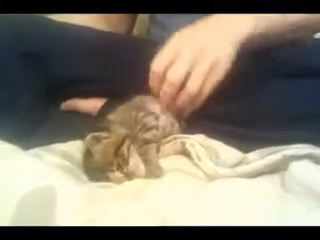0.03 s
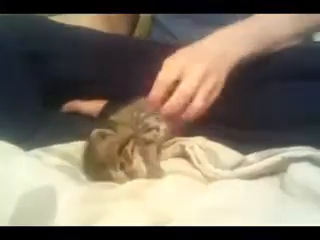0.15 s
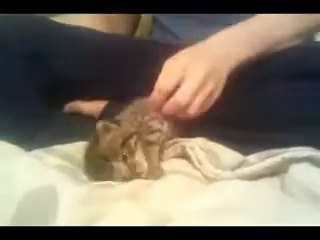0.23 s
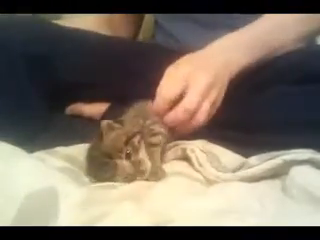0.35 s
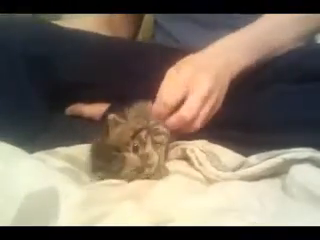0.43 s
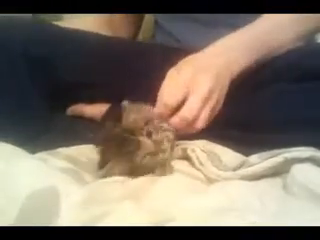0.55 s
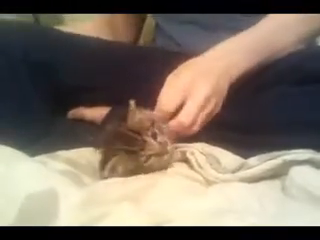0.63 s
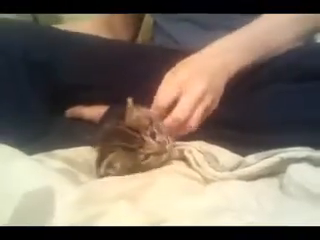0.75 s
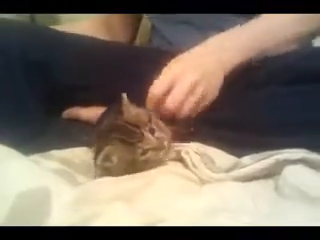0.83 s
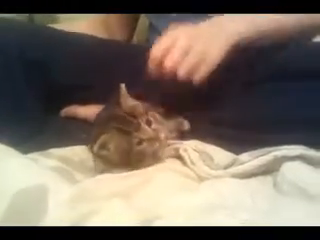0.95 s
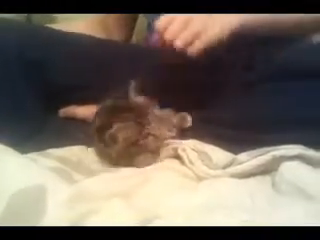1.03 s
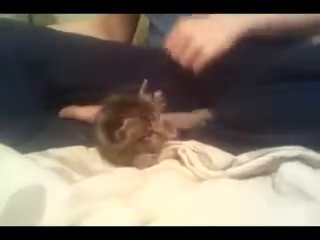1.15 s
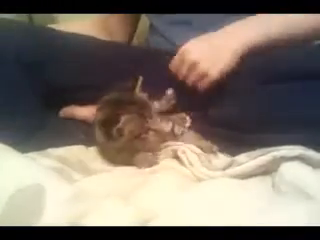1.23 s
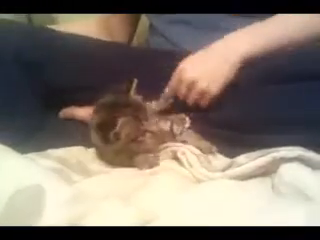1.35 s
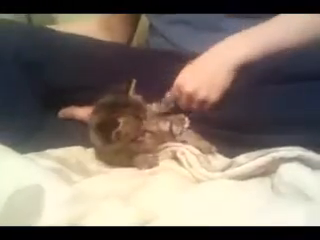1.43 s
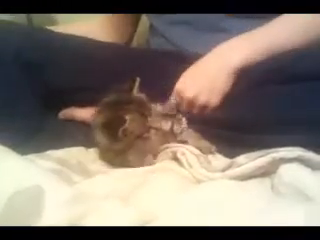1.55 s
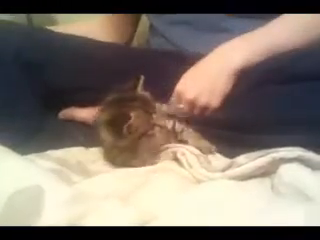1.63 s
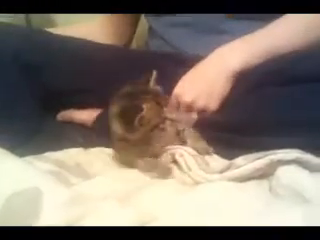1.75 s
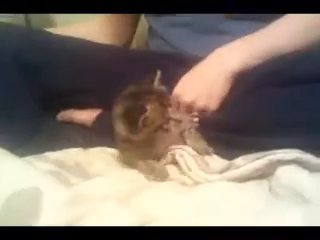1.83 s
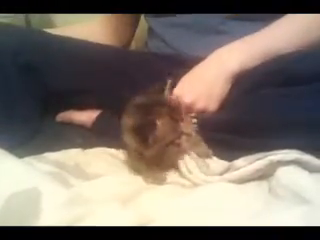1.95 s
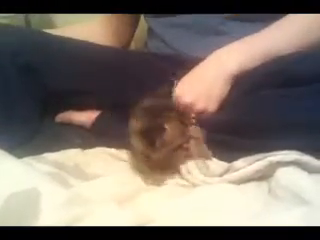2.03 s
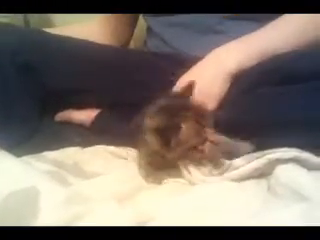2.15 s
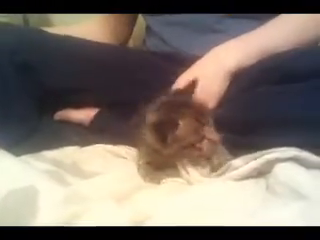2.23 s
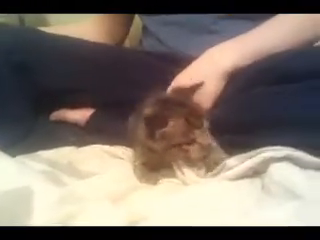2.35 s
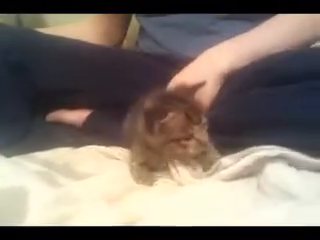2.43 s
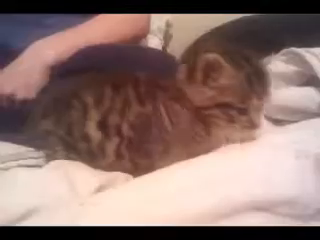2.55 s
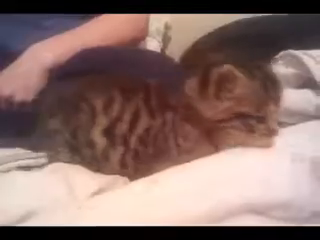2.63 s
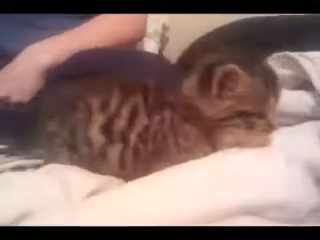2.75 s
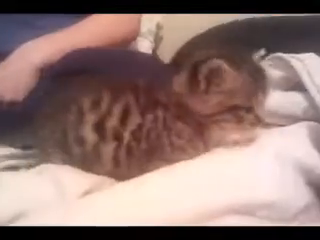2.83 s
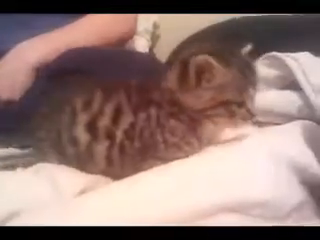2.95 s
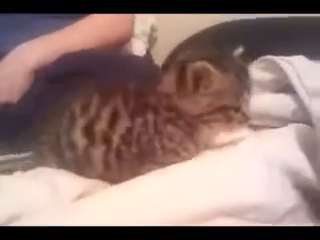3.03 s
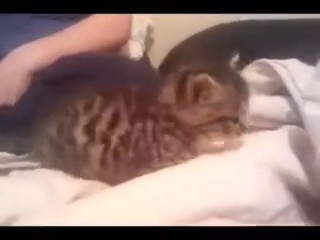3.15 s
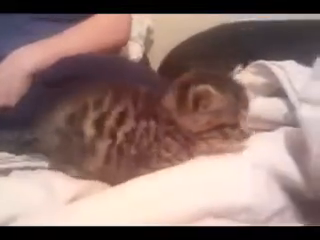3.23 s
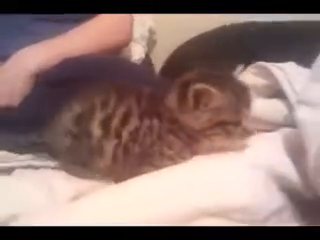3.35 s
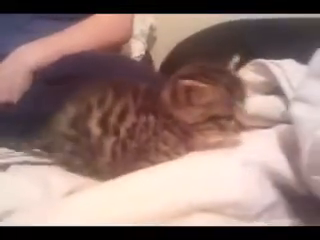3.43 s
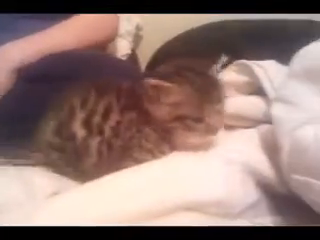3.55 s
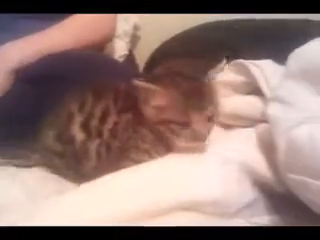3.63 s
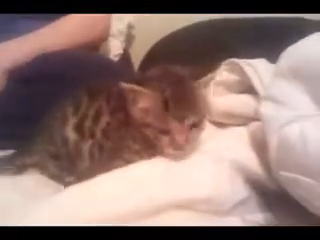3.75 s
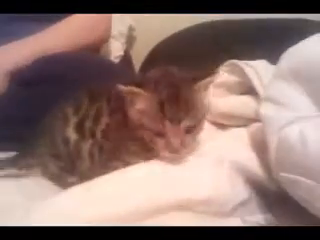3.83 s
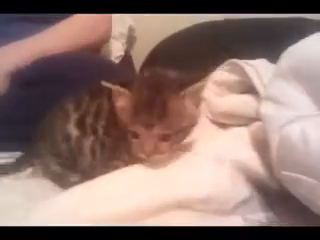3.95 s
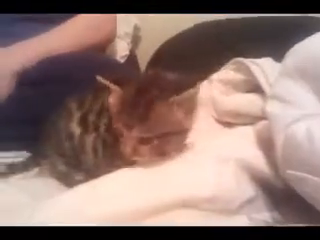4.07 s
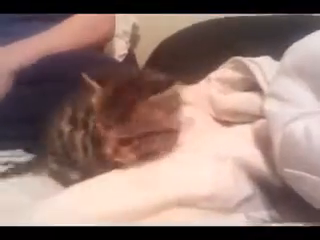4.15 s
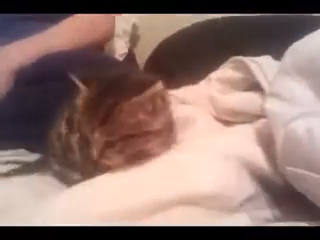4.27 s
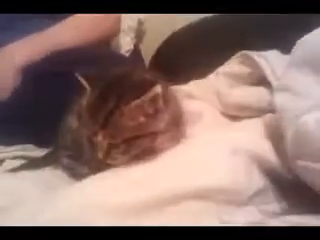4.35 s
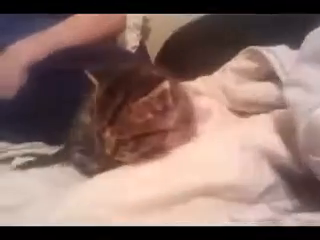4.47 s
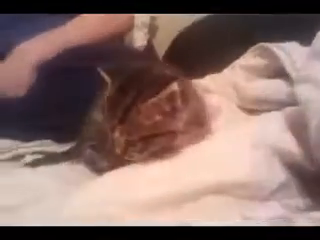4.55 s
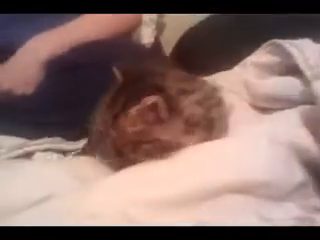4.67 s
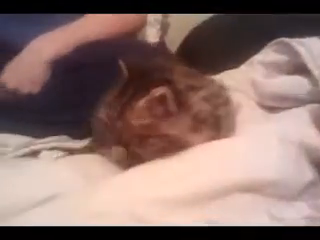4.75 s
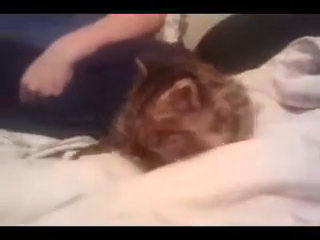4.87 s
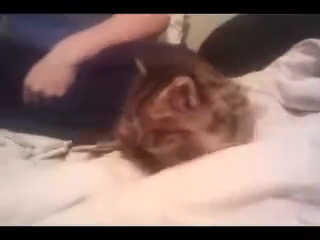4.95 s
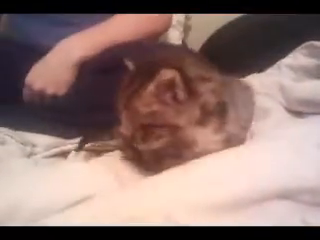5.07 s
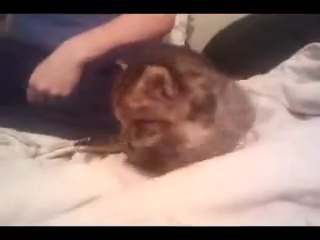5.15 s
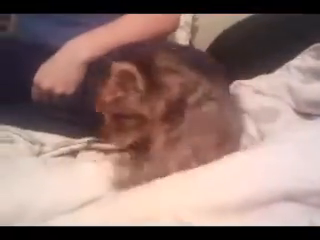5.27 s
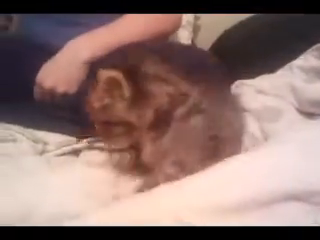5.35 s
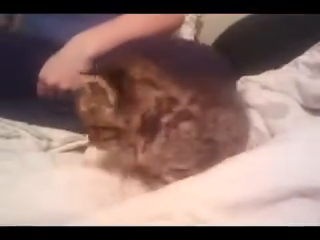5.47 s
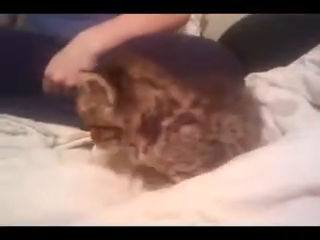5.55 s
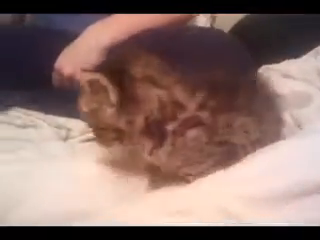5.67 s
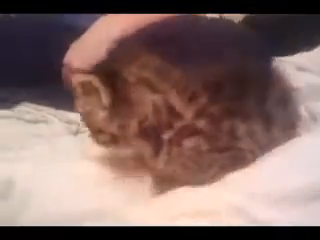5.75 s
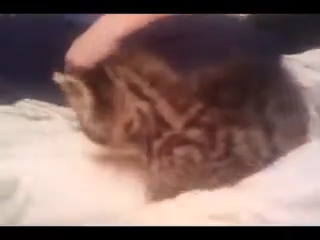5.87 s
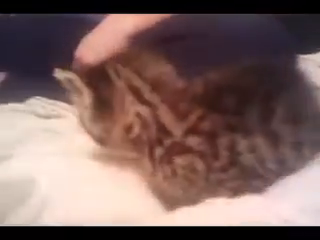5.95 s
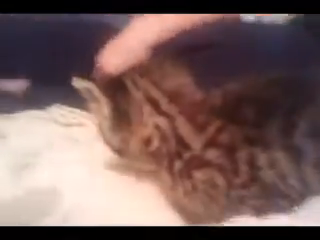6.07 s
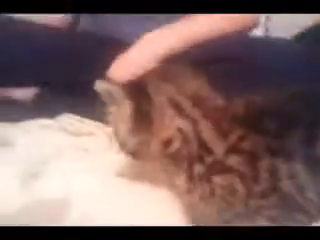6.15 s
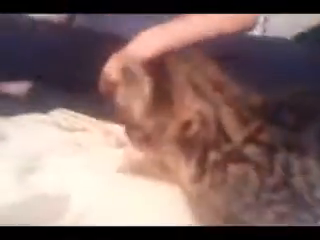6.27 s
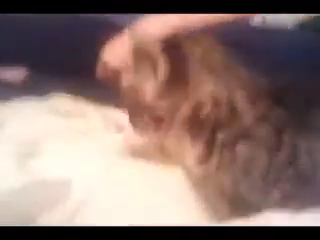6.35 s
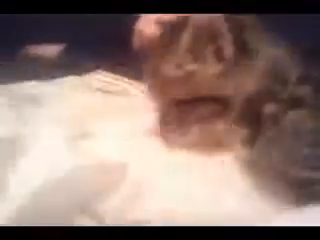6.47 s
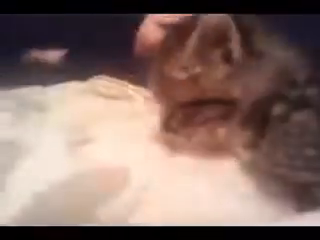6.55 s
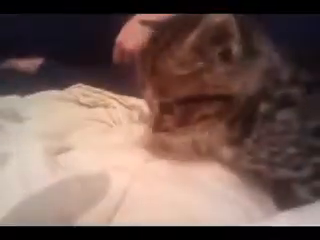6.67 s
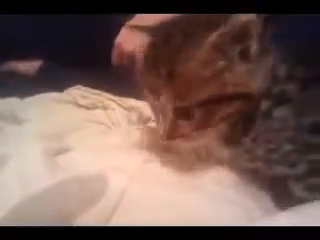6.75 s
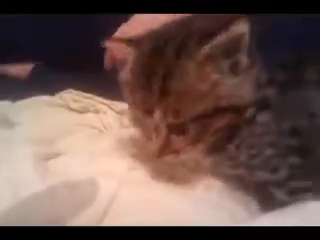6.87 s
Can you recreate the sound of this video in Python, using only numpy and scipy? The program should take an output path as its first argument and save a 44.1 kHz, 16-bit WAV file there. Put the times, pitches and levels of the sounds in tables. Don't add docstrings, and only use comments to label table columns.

```python
import sys
import numpy as np
from scipy import signal
from scipy.fft import rfft, irfft, next_fast_len
from scipy.io import wavfile
from scipy.ndimage import uniform_filter1d, map_coordinates

SR = 44100
rng = np.random.default_rng(int(sys.argv[2]) if len(sys.argv) > 2 else 0)


def inscribe(sig):
    pcm = np.round(np.clip(np.atleast_2d(sig).T, -1, 1) * 32767)
    wavfile.write(sys.argv[1], SR, pcm.astype(np.int16))


def nominal_scale(level):
    x = np.asarray(level, float) / 20
    return 10 ** x


N = 304579
SHORT_T = np.arange(SR // 4) / SR


def unit(x):
    return x / np.sqrt(np.mean(x ** 2) + 1e-20)


def along(points, hz):
    f, v = np.transpose(points)
    return np.interp(np.log(hz + 1), np.log(f + 1), v)


def curves(rows):
    s, *cols = np.transpose(rows)
    t = np.arange(N) / SR
    gate = np.clip(np.minimum(t - s[0], s[-1] - t) / .006, 0, 1)
    return [gate] + [np.interp(t, s, c) for c in cols]


def wobble(rate):
    knots = rng.standard_normal(int(N * rate / SR) + 4)
    return map_coordinates(knots, [np.arange(N) * rate / SR])


def filtered(x, response):
    m = next_fast_len(N + 8192)
    return irfft(rfft(x, m) * response(np.fft.rfftfreq(m, 1 / SR)), m)[..., :N]


def noise(spectrum):
    closed = [(spectrum[0][0] / 2, -90)] + list(spectrum)
    return unit(filtered(rng.standard_normal(N), lambda hz: nominal_scale(along(closed, hz))))


def add(track, s, sound):
    part = track[round(s * SR):][:len(sound)]
    part += sound[:len(part)]


def hump(start, length, db, swell_db, edge):
    t = np.arange(N) / SR - start
    ends = np.clip(np.minimum(t, length - t) / edge, 0, 1)
    return ends * nominal_scale(db + swell_db * np.clip(t / length - .5, -.5, .5))


def ring(s, db, hz, t60):
    drift = np.cumsum(rng.normal(0, .1, len(SHORT_T)))
    level = nominal_scale(db + 3.0 - 60 * SHORT_T / t60) * (1 - np.exp(-SHORT_T / 0.00014))
    return level * np.sin(2 * np.pi * hz * SHORT_T + drift)


def thud(db, hz, t60):
    return -nominal_scale(db + 2.5 - 60 * SHORT_T / t60) * np.sin(2 * np.pi * hz * SHORT_T)


def glide(length, start_hz, end_hz, db, octave_db):
    u = np.linspace(0, 1, round(length * SR))
    phase = 2 * np.pi * np.cumsum(start_hz + (end_hz - start_hz) * u) / SR
    phase = phase + np.cumsum(rng.normal(0, .035, len(u)))
    swell = np.abs(np.sin(np.pi * u ** .7)) ** .6
    octave = nominal_scale(octave_db) * swell ** 4 * (1 - u) * np.sin(2 * phase)
    return nominal_scale(db + 2) * swell * (np.sin(phase) + octave)


def rub(rows, edge):
    flutter = nominal_scale(0.4 * wobble(51) + 0.34 * wobble(500))
    swish, body = unit(flutter * noise(SWISH)), unit(flutter * noise(BODY))
    return sum(hump(*row, edge) * (swish + nominal_scale(body_db) * body) for *row, body_db in rows)


# start_s, level_db
AIR_DRIFT = [(0, 0.5), (.6, -.5), (.95, 0.3), (1.4, 0), (2.7, -0.26), (3.4, 1), (4.25, -0.9), (5.5, 0),
             (6.91, 0.5)]
# pitch_hz, level_db (per Hz)
RUMBLE_COLOUR = [(8, -15.5), (20, -2), (45, 3.5), (80, -4.5), (130, -39.5)]
ROOM_COLOUR = [(60, -7.5), (100, 2.5), (135, 0), (165, -4.5), (200, -2.5), (225, -3.5), (255, -1.5),
               (330, -6.5), (400, -6), (550, -13.5), (900, -25)]
HUM_COLOUR = [(185, -30), (197, 0), (203, 0), (216, -30), (400, -90)]
HISS_COLOUR = [(300, -7), (600, 7.5), (1250, 1.5), (2500, -1.5), (4500, -4.5), (6000, -4.5), (7700, -5)]


def background():
    rumble_db, room_db, hum_db, hiss_db = -58, -51, -61.5, -54
    drift_db = curves(AIR_DRIFT)[1]
    rumble = nominal_scale(rumble_db + 0.65 * wobble(4) + 1.1 * wobble(1.8)) * noise(RUMBLE_COLOUR)
    room = nominal_scale(room_db + drift_db + 0.69 * wobble(9)) * noise(ROOM_COLOUR)
    hum = nominal_scale(hum_db) * noise(HUM_COLOUR)
    hiss = nominal_scale(hiss_db + drift_db + 0.33 * wobble(8.3)) * noise(HISS_COLOUR)
    return rumble + room + hum + hiss


# start_s, peak_db
DIGITAL_TICK = [(2.279, -20)]


def digital_tick():
    out = np.zeros(N)
    for s, db in DIGITAL_TICK:
        add(out, s - .007, nominal_scale(db - 38) * np.hanning(750) ** .5 * rng.standard_normal(750))
        out[round(s * SR)] += nominal_scale(db)

    def colour(hz):
        low_pass = 1 / (1 + (hz / 16200) ** 60)
        return low_pass / (1 + (3800 / (hz + 1)) ** 6) * (1 + 1.3 * (hz < 8000))

    return filtered(out, colour)


# start_s, length_s, start_pitch_hz, end_pitch_hz, level_db
CREAKS = [(0.231, .03, 827, 633, -57), (0.256, 0.048, 1430, 1104, -58), (0.315, 0.022, 1067, 1180, -47),
          (.218, 0.034, 1800, 1480, -62), (0.348, 0.038, 986, 1100, -60), (4.816, 0.026, 405, 376, -50),
          (6.16, .03, 2180, 2100, -56), (6.253, 0.05, 750, 710, -56)]


def creaks():
    out = np.zeros(N)
    for s, *tone in CREAKS:
        add(out, s, glide(*tone, octave_db=-15))
    return out


# start_s, peak_db, pitch_hz, t60_s (time to fall 60 dB)
PAW_BUMPS = [(0.767, -39, 144, 0.04), (2.708, -39, 83, 0.036), (5.76, -45, 22, 0.32),
             (5.841, -39.5, 20, 0.81), (5.95, -46.5, 20.2, 0.75), (6.299, -42.5, 29, 0.51),
             (6.546, -36, 23, 0.072), (6.862, -38.5, 30, 0.21)]


def paw_bumps():
    out = np.zeros(N)
    for s, *swing in PAW_BUMPS:
        add(out, s, thud(*swing))
    return out


# start_s, peak_db, thud_pitch_hz, brightness_db
HOPS = [(3.464, -39, 115, -3), (3.478, -34, 109, -12), (3.502, -37, 105, -2), (3.528, -38.5, 95, -20)]
# pitch_hz, level_db, t60_s
BED_FRAME = [(805, -4.5, 0.019), (1620, 1.5, 0.0068)]


def paw_patter():
    out = np.zeros(N)
    for s, db, hz, bright_db in HOPS:
        add(out, s, thud(db, hz, t60=0.089))
        for k, (mode_hz, mode_db, t60) in enumerate(BED_FRAME):
            add(out, s, ring(s, db + mode_db + k * bright_db, mode_hz, t60))
    return out


# start_s, peak_db, pitch_hz
THREAD_TICKS = [(0.384, -45, 850), (1.823, -46.5, 1200), (1.873, -43.5, 1200), (1.918, -46.5, 900),
                (1.967, -40.5, 880), (2.584, -48, 724), (3.239, -39, 1290), (4.806, -52, 920),
                (4.831, -49, 885), (5.001, -43, 730), (5.046, -37, 800), (5.106, -36.5, 923),
                (5.145, -48, 945), (5.178, -37.5, 806), (5.697, -38.5, 905), (5.776, -40.5, 770),
                (5.866, -36.5, 1470), (6.216, -39.5, 734), (6.285, -43, 697), (6.727, -50, 765),
                (6.772, -48, 1020), (6.802, -47, 700)]


def thread_ticks():
    out = np.zeros(N)
    for s, db, hz in THREAD_TICKS:
        u = hz * SHORT_T
        dip = np.exp(-((u - .45) / .14) ** 2)
        rebound = .75 * np.exp(-((u - .82) / .22) ** 2)
        settle = .12 * np.exp(-((u - 1.5) / .3) ** 2)
        add(out, s + 0.00131, nominal_scale(db + 6) * (rebound - dip - settle))
    return out


# pitch_hz, level_db (per Hz)
SWISH = [(3500, -33), (4600, -7.5), (5500, 1), (6300, 3), (7000, 5), (7900, -2.5)]
BODY = [(300, -4), (700, 0), (1500, -2.5), (3000, -3), (4500, -5), (6000, -12.5)]
# start_s, length_s, swish_db, swell_db, body_over_swish_db
STROKES = [(0.002, 0.11, -51, 9, -25), (.103, 0.097, -46, 2, -17), (.698, 0.1, -42.5, -8, -5),
           (.785, 0.14, -44.5, 15, -7.5), (.9, 0.15, -39.5, -2, -8.5), (1.008, 0.097, -45.5, -17, -5),
           (2.008, .045, -50.5, -2, -7), (2.07, 0.047, -54, 0, -12), (5.745, 0.209, -60, 1, 5),
           (5.925, 0.23, -61, -3, 2.5), (6.122, 0.18, -57, -7, -0.5), (6.27, 0.088, -47, 0, -6),
           (6.368, 0.054, -50, -2, -1.5)]


def blanket_strokes():
    return rub(STROKES, edge=0.032)


# start_s, length_s, swish_db, swell_db, body_over_swish_db
SCRAPE = [
    (6.424, 0.022, -41.5, 4.5, -3),
    (6.449, 0.013, -37, -4, -8),
    (6.46, 0.041, -37.5, -15, -11.5),
    (6.499, .038, -40, 9, -9.5),
]


def claw_scrape():
    jerks = unit(nominal_scale(3.5 * wobble(900)))
    return jerks * rub(SCRAPE, edge=0.0034)


# start_s, peak_db, pitch_hz
SNAGS = [(2.256, -43, 7350), (2.2562, -46, 4600), (2.2595, -42.5, 7400), (2.283, -41, 7400),
         (5.247, -45, 4000), (5.304, -44, 3300), (6.2135, -47, 6500), (6.4315, -39, 5000),
         (6.4566, -31, 5800), (6.4713, -27, 7220), (6.4955, -26, 7400), (6.495, -38, 3400),
         (6.5267, -35, 6540), (6.5341, -17.5, 7300)]
# start_s, peak_db, pitch_hz, t60_s
LET_GO = [(6.536, -14, 2960, 0.0013)]


def claw_snags():
    out = np.zeros(N)
    for s, db, hz in SNAGS:
        add(out, s, ring(s, db, hz, t60=0.006))
    for row in LET_GO:
        add(out, row[0], ring(*row))
    return out


# start_s, peak_db
BLOWS = [
    (6.4342, -6.5),
    (6.4378, -13),
    (6.4397, -17),
]
# pitch_hz, level_db, t60_s
HOUSING = [(5740, 0, 0.0026), (5550, -11, .003), (3900, -9.5, 0.0044), (2070, -11, 0.0022),
           (860, -21.5, 0.0086)]


def housing_blows():
    out = np.zeros(N)
    for k, (s, db) in enumerate(BLOWS):
        thins_db = 2 * min(k, 1)
        for j, (hz, mode_db, t60) in enumerate(HOUSING):
            add(out, s, ring(s, db + mode_db - thins_db * j, hz, t60))
    return out


# start_s, peak_db, relaxation_s
KICKS = [(6.4411, -31.5, 0.00054), (6.4722, -24.5, 0.0007), (6.5357, -17.5, 0.0014)]


def diaphragm_kicks():
    out = np.zeros(N)
    for s, db, rest in KICKS:
        u = SHORT_T / rest - 3
        press = -np.exp(1.14 * np.minimum(u, 0))
        release = (2.6 * u - 1) * np.exp(-1.05 * u) * np.cos(0.45 * u)
        add(out, s - 3 * rest, nominal_scale(db) * np.where(u < 0, press, release))
    return out


# start_s, length_s, start_pitch_hz, end_pitch_hz, level_db
GRUNTS = [(4.722, 0.024, 445, 422, -46.5), (4.734, .05, 522, 418, -42), (4.993, 0.042, 384, 325, -47.5)]
# pitch_hz, level_db (per Hz)
PUFF = [(250, -14), (450, 1), (900, -3), (1300, -14), (2200, -29)]


def grunts():
    out, puffs = np.zeros(N), 0
    for s, length, start_hz, end_hz, db in GRUNTS:
        add(out, s, glide(length, start_hz, end_hz, db, octave_db=-3.5))
        puffs = puffs + hump(s - .008, length + .026, db - 9.5, -2, edge=0.013)
    return out + puffs * noise(PUFF)


# start_s, length_s, level_db, swell_db
RASP = [
    (2.718, 0.033, -49, 5),
    (3.235, 0.028, -59, 0),
]
# pitch_hz, level_db (per Hz)
MOUTH = [(300, -4.5), (600, 0), (1300, 6), (2000, -8), (3000, -17), (5000, -22)]


def rasp(phase):
    loudness = sum(hump(*row, edge=0.011) for row in RASP)
    return loudness * (1 + np.sin(phase)) * noise(MOUTH)


# start_s (centre), slip_hz, half_width_s
PITCH_SLIPS = [(2.845, -8, .008), (2.862, 8, .009), (2.92, -13, .013), (2.953, 22, .011),
               (2.983, -14, .009), (3.047, 12, .025), (3.192, -14, .008)]


def voice_phase(hz):
    hz = uniform_filter1d(hz, size=SR // 60)
    t = np.arange(N) / SR
    hz = hz + sum(slip * np.exp(-((t - s) / width) ** 2) for s, slip, width in PITCH_SLIPS)
    return 2 * np.pi * np.cumsum(hz * (1 + .004 * wobble(70) + .005 * wobble(300))) / SR


# start_s, pitch_hz, effort_db
MEW_ARCH = [(2.735, 545, -46.5), (2.775, 692, -45), (2.82, 795, -45.5), (2.875, 846, -43), (2.99, 792, -46),
            (3.12, 696, -48), (3.178, 597, -49.5), (3.215, 510, -55), (3.26, 432, -56)]
# pitch_hz, level_db
LIPS = [(860, 0), (920, -12), (1050, -2), (1450, -1), (1650, -3), (1800, -8), (2100, -14), (2450, -10.5)]
# pitch_hz, level_db
THROAT = [(1500, -4), (2750, 4), (3100, -1), (3320, -13), (3800, -8), (4150, 0), (4700, -1), (5300, -10)]


def mew():
    gate, hz, effort_db = curves(MEW_ARCH)
    phase = voice_phase(hz)
    hz = uniform_filter1d(hz, size=SR // 60)
    t = np.arange(N) / SR
    hz = hz + sum(slip * np.exp(-((t - s) / width) ** 2) for s, slip, width in PITCH_SLIPS)
    loudest_db = -43
    upper_db = loudest_db - 18.5 + .5 * (effort_db - loudest_db)
    levels = [effort_db + along(LIPS, k * hz) for k in range(1, 4)]
    levels += [upper_db - 4 * max(k - 5, 0) + along(THROAT, k * hz) for k in range(4, 8)]
    voice = np.zeros(N)
    for k, db in enumerate(levels):
        flicker_db = (.8 + .3 * k) * wobble(60)
        voice += nominal_scale(db + flicker_db) * np.cos((k + 1) * phase - .7)
    return rasp(phase) - np.sqrt(2) * gate * voice


def scene():
    bed = creaks() + paw_bumps() + paw_patter()
    cloth = thread_ticks() + blanket_strokes()
    claw = claw_scrape() + claw_snags() + housing_blows() + diaphragm_kicks()
    return (background() + bed + cloth + claw + grunts() + mew())[None]


def top_cut(x):
    return signal.sosfilt(signal.butter(12, 16800, fs=SR, output="sos"), x)


def record(dry):
    first_rate_hz = 16000
    narrow = filtered(dry, lambda hz: 1 / (1 + (hz / 7880) ** 110))
    mirror = np.cos(2 * np.pi * first_rate_hz * np.arange(N) / SR)
    image = nominal_scale(-51.5) * narrow * mirror + nominal_scale(-99) * rng.standard_normal(N)
    image = filtered(image, lambda hz: (hz > 11000) * (hz < 15700))
    mix = narrow + image + digital_tick() - .001
    return top_cut(mix)


dry = scene()
out = record(dry)
inscribe(out)
```